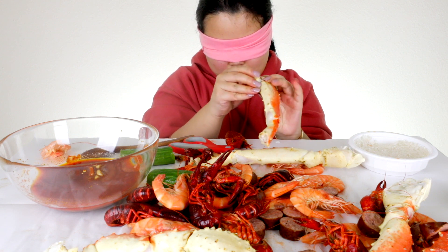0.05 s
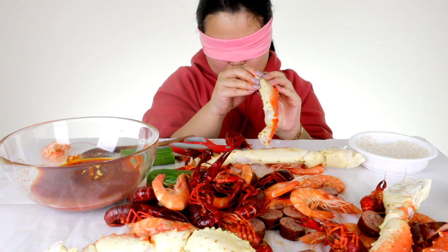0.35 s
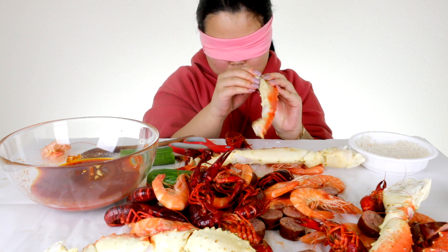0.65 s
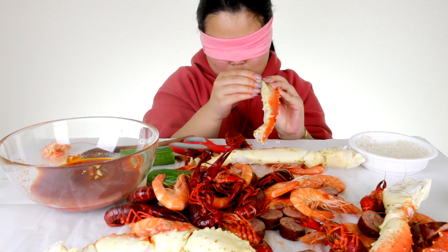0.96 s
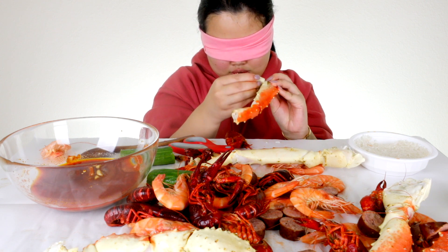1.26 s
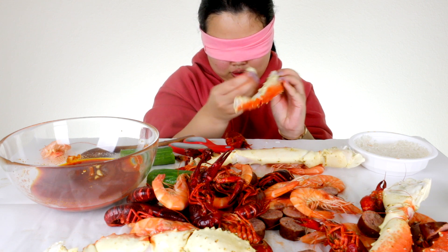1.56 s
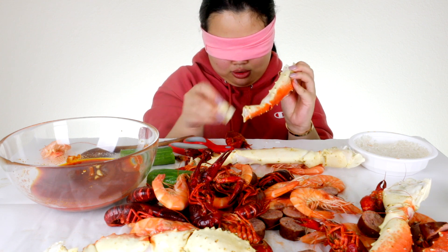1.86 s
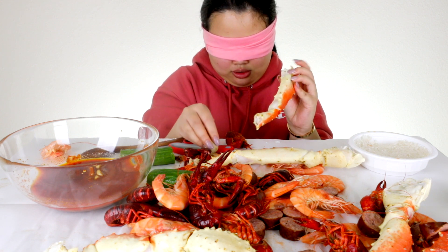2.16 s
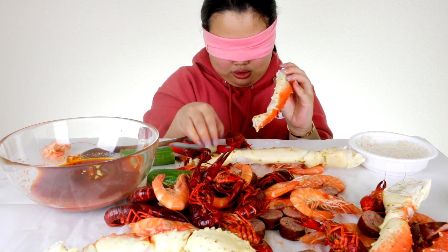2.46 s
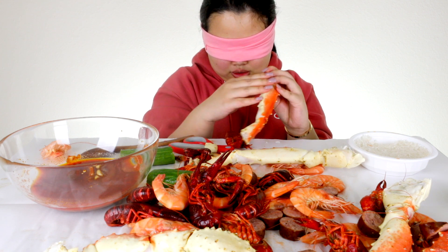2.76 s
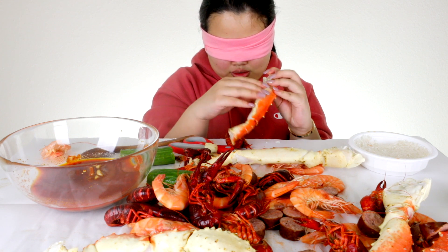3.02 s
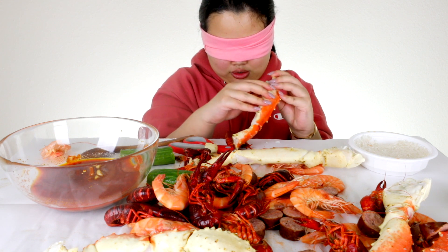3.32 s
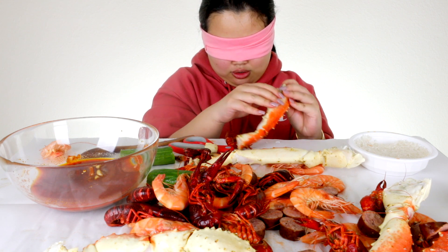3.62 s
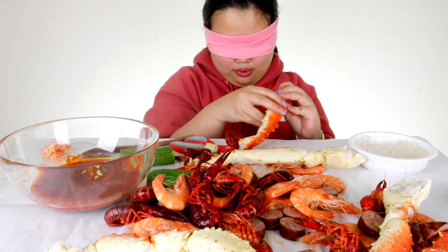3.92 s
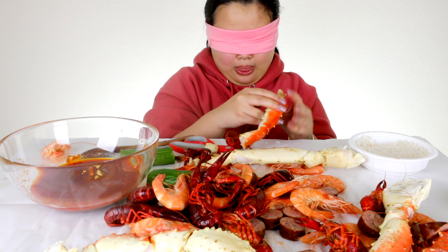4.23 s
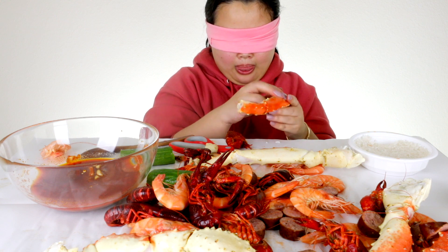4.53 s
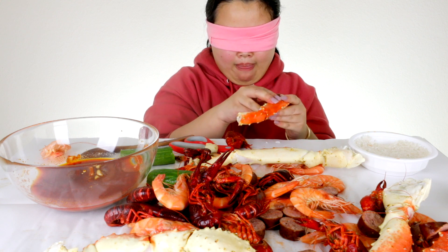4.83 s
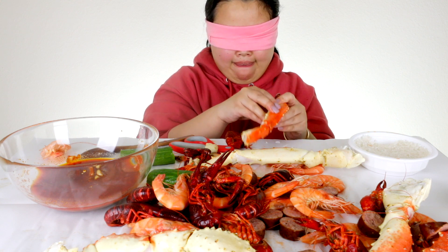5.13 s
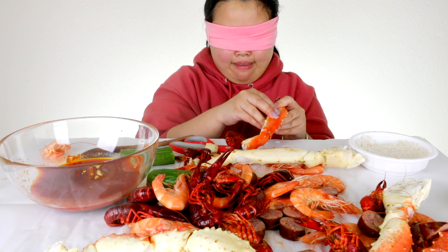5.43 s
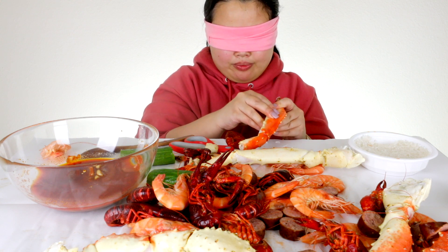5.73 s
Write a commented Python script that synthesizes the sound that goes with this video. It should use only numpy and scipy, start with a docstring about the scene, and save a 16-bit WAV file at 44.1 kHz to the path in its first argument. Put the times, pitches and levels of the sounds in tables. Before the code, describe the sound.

A cooked crab leg is broken by hand close to the microphone in a small, bare room. A few light shell clicks come in the first half second, then a sharper one leads into a very loud, bright snap at about 0.7 seconds. Crackling builds near 1.2 seconds, and a second loud snap follows at 1.3. Both snaps slightly overload the microphone. From about 1.4 to 1.6 seconds the joint tears in a quick run of bright ticks. From 2 seconds on, fingers pick at the shell much more quietly, with scattered, slightly hollow clicks, faint scrapes and tiny dull knocks, clustering around 2.1, 2.8 to 4, and 4.7 to 5.2 seconds. A last small, crisp crack comes near 5.8 seconds. Each crack has a short room echo, and a faint, steady low room tone and hiss lie underneath throughout.

```python
"""A cooked crab leg, bent and snapped by hand at a table, close to the microphone in a small, bare room.
Two loud snaps overload the input; the joint then tears in a run of bright ticks, and fingers pick at
the shell. Each crack briefly rings the hollow leg, the shell wall and the breaking edge, then hangs
in the room. Underneath lie a low, steady room tone and microphone hiss."""
import sys
import numpy as np
from scipy import signal
from scipy.fft import rfft, irfft
from scipy.io import wavfile

SR = 44100
rng = np.random.default_rng(int(sys.argv[2]) if len(sys.argv) > 2 else 0)


def dump(signal):
    """Clip the signal to [-1, 1] and save it as 16-bit WAV at the path in sys.argv[1]."""
    limited = np.clip(np.atleast_2d(signal).T, -1, 1)
    pcm = np.round(limited * 32767).astype(np.int16)
    wavfile.write(sys.argv[1], SR, pcm)


N = 263717

# spectrum of the room tone and hiss: f/Hz, relative level/dB
ROOM_TONE = [(20, -23), (42, -5.5), (65, -14.5), (105, -4), (230, -6.5), (480, -10), (1000, -12),
             (2000, -16), (3500, -22), (5400, -29.5), (7200, -24), (8600, -29.5), (10800, -24),
             (16000, -30)]
# first reflections off table and walls: delay/s, relative level/dB
REFLECTIONS = [(.001, -16), (.0022, -13.5), (.0056, -12), (.0083, -19), (.0095, -18), (0.0101, -16.5)]
# colour of the room tail: f/Hz, relative level/dB
TAIL_COLOUR = [(100, -15), (550, -6.5), (950, 1.5), (1400, -1), (1950, 3), (2600, 2), (3400, -7),
               (4300, -1), (5400, -2), (6800, -0.5), (8500, -4.5), (11000, -1), (13200, -2.5), (15000, 2.5)]
# ring time of the room: f/Hz, t60/s
TAIL_T60 = [(500, .33), (1500, 0.39), (3480, 0.41), (7000, 0.36), (10000, .315), (15000, 0.24)]
# dull knocks of hands and leg, and the low thud of the overloaded snap at 1.278 s:
# t/s, level/dB, f/Hz, decay/s
DULL_BUMPS = [(0.02, -46.5, 473, 0.011), (0.328, -49, 486, 0.0058), (1.278, -4.5, 132.6, 0.00032),
              (2.85, -55, 98, 0.17), (3.008, -44.5, 104.2, .016), (3.3455, -46.5, 668, 0.0055),
              (3.464, -37, 646, 0.0012), (3.755, -51.5, 430, 0.04), (3.773, -39.5, 740, 0.0075),
              (4.698, -48.5, 192.7, 0.019), (5.204, -50, 223, 0.028), (5.37, -53.5, 203, 0.037)]
# shell and fibres scraping and tearing: t/s, length/s, level/dB, f/Hz, width/octaves
SHELL_SCRAPES = [(0.0, 0.046, -53, 1330, 0.97), (.728, 0.013, -49, 1620, 0.65),
                 (1.164, 0.077, -44, 9000, 0.25), (1.538, 0.051, -37.5, 8140, 0.29),
                 (1.611, 0.013, -34, 1230, 0.7), (2.095, 0.05, -52, 7500, 1.5),
                 (2.525, 0.067, -58.5, 2220, 0.6), (2.615, 0.13, -68.5, 3200, 0.69),
                 (3.463, 0.024, -50, 2628, 0.37), (3.535, 0.026, -59, 5960, 1.36),
                 (3.718, 0.06, -51, 1400, 1.56), (3.755, 0.037, -49, 1830, 1.3),
                 (3.73, 0.11, -62.5, 8520, 0.95), (3.87, 0.25, -69, 9050, 0.71),
                 (4.705, 0.094, -60, 1707, 1), (5.205, 0.056, -54, 6770, 0.35),
                 (5.34, 0.18, -69, 1615, 1.8), (5.61, 0.052, -67, 9430, 1.1),
                 (5.78, 0.025, -60.5, 7070, 0.88)]
# stretches where the shell gives way in ticks: t/s, length/s, hollow level/dB, edge level/dB
TICK_RUNS = [(1.178, .07, -48, -24), (1.492, .1, -30.5, -21), (3.93, .1, -45.5, -41.5),
             (4.731, .045, -31, -51.5)]
# modes of the hollow leg, low end dulled by meat and fingers: pitch ratio, width/octaves, level/dB
HOLLOW_MODES = [(1.04, 0.77, 2), (0.56, 0.68, -8.5), (0.43, 0.96, -19.5)]
# modes of the shell wall: f/Hz, width/octaves, level/dB
WALL_MODES = [(2660, 0.44, 0), (4165, 0.48, 1)]
# modes of the breaking edge: pitch ratio, width/octaves, level/dB
EDGE_MODES = [(.84, 0.47, -1), (1.19, 0.57, 1.5)]
# cracks that stand out: t/s, hollow level/dB, hollow f/Hz, edge level/dB
SHELL_CRACKS = [(0.0198, -27, 1600, -56), (0.2034, -29, 1830, -41), (0.3275, -18.5, 1530, -35.5),
                (0.476, -33.5, 1440, -69), (0.5827, -25, 1580, -7), (0.7346, -28, 1490, -14),
                (0.7464, 0.9, 1670, 13), (1.162, -55, 1390, -25), (1.1675, -54, 1400, -19),
                (1.1796, -23, 1390, -6), (1.2136, -38, 1650, -10.5), (1.2785, -4.5, 1560, 8),
                (1.2815, -14, 1650, 9.5), (1.3092, -11, 1980, 2), (1.4488, -26.5, 1770, -18),
                (1.4897, -19.5, 1980, -9), (1.5091, -27, 1870, -16), (1.5326, -29, 1850, -13),
                (1.5512, -20.5, 1850, -9.5), (1.6058, -35, 1400, -15), (1.6101, -9, 1640, -8),
                (2.0434, -36.5, 1550, -30), (2.0954, -36, 1300, -28), (2.1196, -32.5, 1630, -22.5),
                (2.1283, -30, 1700, -21), (2.2711, -42.5, 1280, -36), (2.4498, -31.5, 1590, -41.5),
                (2.624, -30.5, 1875, -39), (2.7778, -23, 1060, -28), (2.9121, -28, 1900, -29.5),
                (3.1401, -28, 1840, -30.5), (3.1757, -22, 1720, -31.5), (3.3456, -20, 1590, -38.5),
                (3.4641, -17, 1400, -33), (3.5363, -34.5, 1230, -47), (3.7358, -23, 1580, -26.5),
                (3.7724, -19, 1730, -38.5), (4.7213, -22, 1640, -40), (4.7929, -41, 1510, -30.5),
                (4.8371, -26.5, 1330, -49), (4.919, -47, 1180, -33), (5.217, -29.5, 1350, -26.5),
                (5.7757, -32.5, 1240, -38), (5.828, -27, 1214, -19), (5.8365, -53, 1380, -15.5)]


def amp(db):
    """Decibels to gain."""
    return 10 ** (np.asarray(db) / 20)


def unit(x):
    """Scales a sound to energy 1."""
    return x / np.sqrt(np.sum(x ** 2) + 1e-20)


def read(points, hz):
    """Reads a table on a log-frequency axis."""
    f, value = np.transpose(points)
    return np.interp(np.log(hz + 1), np.log(f + 1), value)


def add(mix, s, sound):
    """Adds a sound into the mix at time s."""
    part = mix[max(round(s * SR), 0):][:len(sound)]
    part += sound[:len(part)]


def resonate(x, hz, octaves):
    """A broad, heavily damped resonance."""
    edges = np.clip(hz * 2 ** (np.array([-.5, .5]) * octaves), 20, .48 * SR)
    return signal.lfilter(*signal.butter(2, edges, "band", fs=SR), x)


def room_tone(rms_db=-59.5):
    """The steady low rumble of the room, with the microphone's own hiss."""
    hz = np.fft.rfftfreq(N, 1 / SR)
    noise = irfft(rfft(rng.standard_normal(N)) * amp(read(ROOM_TONE, hz)), N)
    return amp(rms_db) * np.sqrt(N) * unit(noise)


def room_response(gap_s=0.00073, build_s=0.0053, scatter_s=0.0015, echoes_db=1.56, tail_db=1.0):
    """The bare room: a few echoes scattered by the laden table, then dense ones dying band by band."""
    t = np.arange(SR // 2) / SR
    taps = rng.choice([-1., 1.], len(t)) * (rng.random(len(t)) < 12000 / SR)  # 12000 echoes a second
    taps /= np.linalg.norm(taps[:1200])  # energy 1 in the first 27 ms
    hz, frame_s, bands = signal.stft(taps, SR, nperseg=256)
    decay = np.exp(-np.log(1000) * frame_s / read(TAIL_T60, hz)[:, None])
    bands *= amp(read(TAIL_COLOUR, hz)[:, None]) * decay
    tail = signal.istft(bands, SR, nperseg=256)[1][:len(t)]
    build_up = 1 - np.exp(-np.maximum(t - gap_s, 0) / build_s)
    response = amp(tail_db) * tail * build_up
    for delay, db in REFLECTIONS:
        scatter = unit(rng.standard_normal(len(t)) * np.exp(-t / scatter_s))
        add(response, delay, amp(db + echoes_db) * scatter)
    return response


def bump(db, hz, decay_s):
    """A dull knock or low thud that dies away as a damped sine."""
    t = np.arange(SR // 2) / SR
    return amp(db) * np.sin(2 * np.pi * hz * t) * np.exp(-t / decay_s)


def scrape(length_s, db, hz, octaves, slips_per_s=1100, spread_db=2.0):
    """Shell and fibres rub and tear in a swell of small, uneven slips."""
    count = int(length_s * SR)
    sizes = amp(spread_db * np.minimum(rng.exponential(1, count), 4)) * rng.choice([-1, 1], count)
    slips = sizes * (rng.random(count) < slips_per_s / SR) * signal.windows.tukey(count, .5)
    rasp = resonate(np.pad(slips, (0, count)), hz, octaves)
    return amp(db) * np.sqrt(count) * unit(rasp)


def tick_run(start_s, length_s, hollow_db, edge_db, ticks_per_s=60, spread_db=4, hollow_hz=1610):
    """The shell gives way bit by bit: rows of small cracks, uneven in spacing and strength."""
    slots = np.arange(16)
    delays = (slots + rng.random(len(slots))) / ticks_per_s
    strengths_db = spread_db * rng.standard_normal(len(slots))
    return [(start_s + s, hollow_db + db, hollow_hz, edge_db + db)
            for s, db in zip(delays, strengths_db) if s < length_s]


def fracture(grit, run_s, smear_s=.0011):
    """A sudden release of stress, then tiny slips (the grit) while the crack runs on."""
    t = np.arange(512) / SR
    push = grit * unit(rng.standard_normal(len(t)) * np.exp(-t / run_s))
    push[0] = 1
    # smear each click over about a millisecond, highs first, to soften its peak
    hz = np.fft.rfftfreq(len(t), 1 / SR)
    lag_s = smear_s * (1 - hz / hz[-1]) ** 2
    phase = 2 * np.pi * np.cumsum(lag_s) * hz[1]
    return irfft(rfft(push) * np.exp(-1j * phase), len(t))


def ring(push, modes, pitch=1):
    """A push rings one part of the shell; alternate signs keep the valleys between modes shallow."""
    return unit(sum((-1) ** k * amp(db) * unit(resonate(push, hz * pitch, octaves))
                    for k, (hz, octaves, db) in enumerate(modes)))


def crack(hollow_db, hollow_hz, edge_db, grit, wall_loss_db=5.5):
    """The crab leg cracks, ringing its hollow, its shell wall and the breaking edge."""
    wall_db = (hollow_db + edge_db) / 2 - wall_loss_db  # the wall lies between edge and hollow
    edge_hz = 8500 + 13.5 * edge_db  # the harder the edge breaks, the higher it rings
    hollow = ring(fracture(grit, run_s=0.0043), HOLLOW_MODES, hollow_hz)
    wall = ring(fracture(grit, run_s=0.00017), WALL_MODES)
    edge = ring(fracture(grit, run_s=0.00025), EDGE_MODES, edge_hz)
    return amp(hollow_db) * hollow + amp(wall_db) * wall + amp(edge_db) * edge


def scene(path_count=4, scrape_send_db=-3.5, crack_send_db=0.2, mic_top_hz=13400):
    """One microphone at the table: the leg close up, the room behind it."""
    floor = room_tone()
    # the leg turns in the hands, so successive cracks reach the room by different paths
    paths = [room_response() for _ in range(path_count)]
    direct, sends = np.zeros(N), np.zeros((path_count, N))
    for s, *thud in DULL_BUMPS:
        add(direct, s, bump(*thud))
    for k, (s, *slips) in enumerate(SHELL_SCRAPES):
        rasp = scrape(*slips)
        add(direct, s, rasp)
        add(sends[k % path_count], s, amp(scrape_send_db) * rasp)
    ticks = [tick for run in TICK_RUNS for tick in tick_run(*run)]
    for k, (s, *shell) in enumerate(SHELL_CRACKS + ticks):
        add(direct, s, crack(*shell, grit=0.92))
        # the room gathers the fracture from all sides, which evens out its grit
        add(sends[k % path_count], s, amp(crack_send_db) * crack(*shell, grit=0.13))
    reverb = sum(signal.oaconvolve(send, path)[:N] for send, path in zip(sends, paths))
    # the microphone softens the very top of each snap
    at_mic = signal.lfilter(*signal.butter(2, mic_top_hz, fs=SR), direct + reverb)
    return (at_mic + floor)[None]


def record(dry, cutoff_hz=16200):
    """At this distance the loudest snaps clip the input; a steep low-pass follows."""
    clipped = np.clip(dry, -1, 1)
    low_pass = signal.firwin(255, cutoff_hz, window=("kaiser", 8), fs=SR)
    return signal.oaconvolve(clipped, low_pass[None], "same")


dry = scene()
out = record(dry)
dump(out)
```